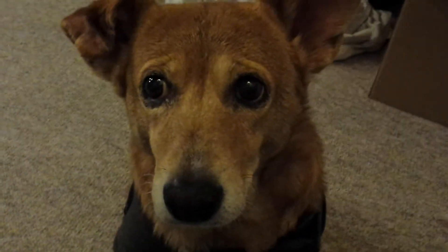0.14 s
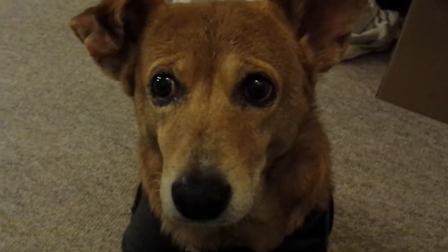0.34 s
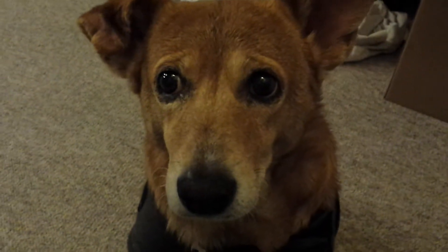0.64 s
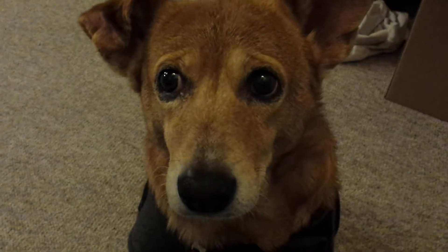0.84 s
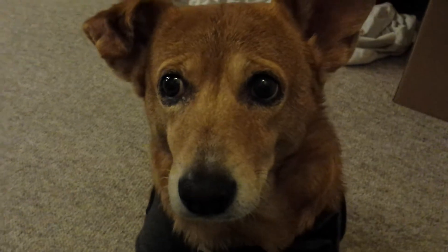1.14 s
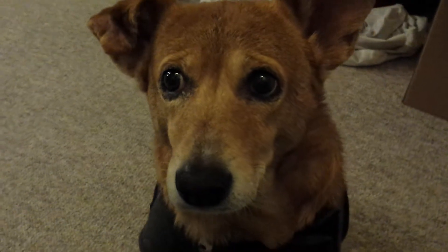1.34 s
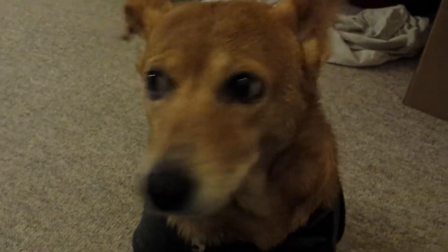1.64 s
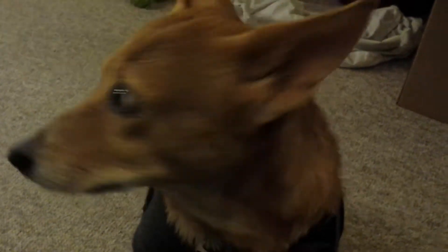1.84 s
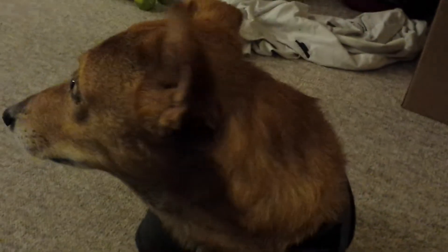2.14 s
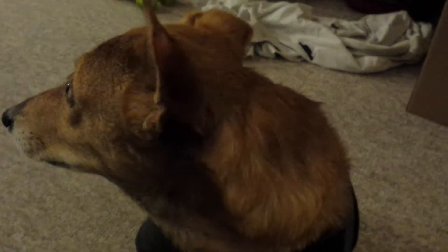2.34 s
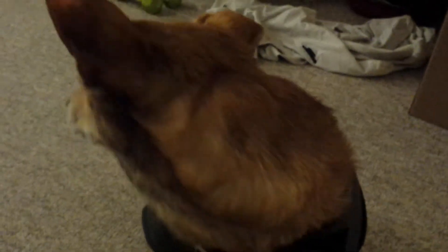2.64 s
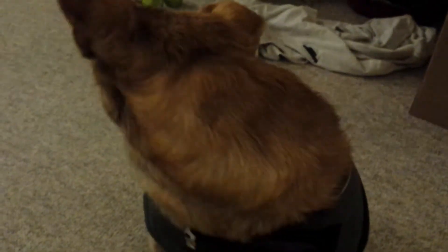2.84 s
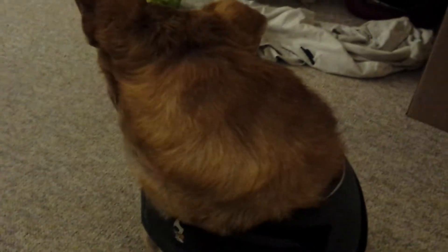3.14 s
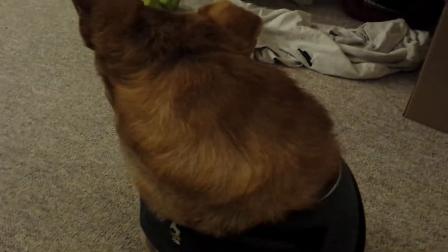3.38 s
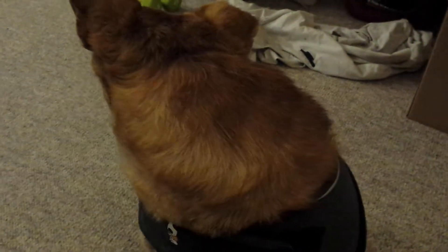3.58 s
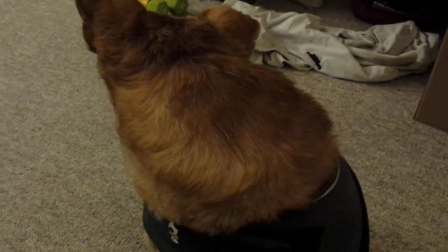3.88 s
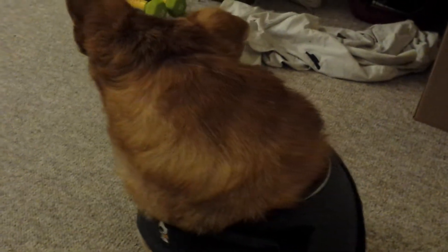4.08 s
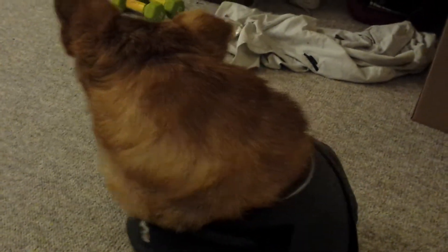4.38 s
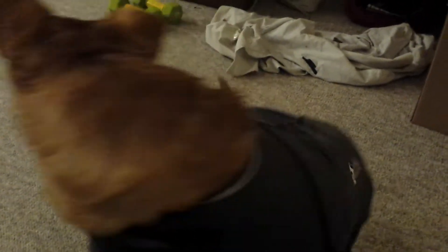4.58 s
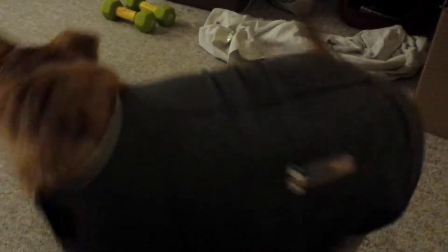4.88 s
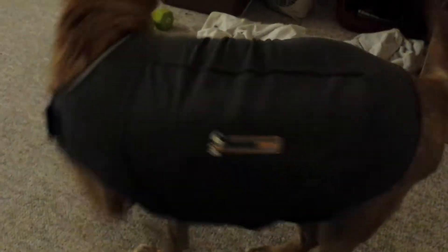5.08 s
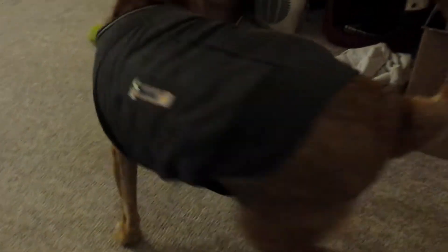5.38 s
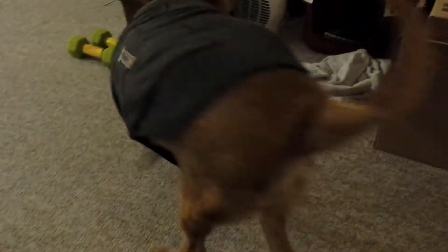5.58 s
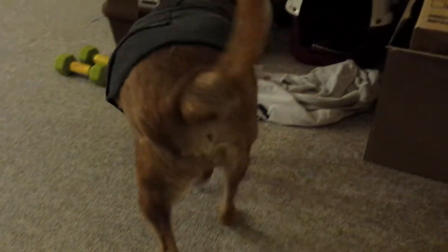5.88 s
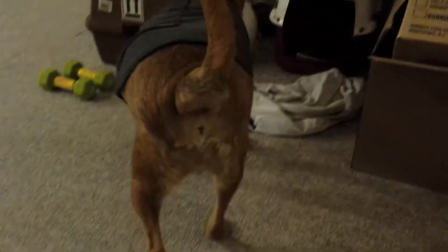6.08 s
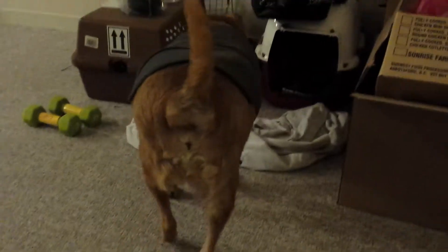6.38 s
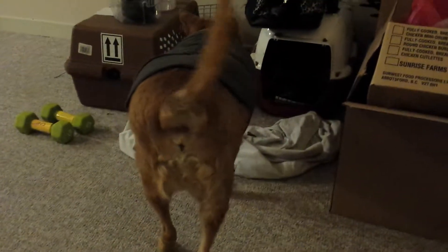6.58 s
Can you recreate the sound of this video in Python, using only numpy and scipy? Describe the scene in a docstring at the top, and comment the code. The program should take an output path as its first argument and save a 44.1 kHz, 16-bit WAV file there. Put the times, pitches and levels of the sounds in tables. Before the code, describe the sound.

Soft, close rustles and light clicks come from a small dog fidgeting in a cloth coat, slightly to the left. Two sharp static pops, far louder than anything else, strike the microphone three seconds apart, first left, then right. Afterwards the rustling grows busier as padded steps thump and scuff across the carpet, then die down. The room is hushed and dry, with a barely audible engine far outside.

```python
"""Small dog in a coat on carpet.

A dog shifts about close to a camera, gets up and walks off. Its fabric coat rustles over fur, its paws
scuff the pile and thud on the floor, and the coat's fastening ticks. Twice, static snaps into one
microphone channel. Far outside the quiet room an engine speeds up and settles."""
import sys
import numpy as np
from scipy import signal
from scipy.fft import rfft, irfft, next_fast_len
from scipy.io import wavfile
from scipy.ndimage import map_coordinates

SR = 44100
rng = np.random.default_rng(int(sys.argv[2]) if len(sys.argv) > 2 else 0)


def unload_wav(signal):
    """Save mono or channel-first audio to the path in sys.argv[1] as 16-bit WAV at rate SR, clipped to [-1, 1]."""
    wavfile.write(
        sys.argv[1],
        SR,
        np.round(np.clip(np.atleast_2d(signal).T, -1, 1) * 32767).astype(np.int16),
    )


N = 296352

# coat over fur, one swish per head turn or stride: peak_s, level_db, rise_s, fall_s
COAT_SWISHES = [(.028, -51, 0.039, 0.035), (.068, -56.5, .015, 0.049), (.15, -65, 0.065, 0.15),
                (.57, -56, 0.1, 0.18), (.725, -56.5, 0.078, 0.051), (0.873, -57, 0.013, 0.12),
                (1.03, -55.5, 0.093, 0.052), (1.21, -55, .06, 0.17), (1.379, -46.5, .06, 0.042),
                (1.431, -48.5, 0.035, 0.051), (1.51, -62, .04, 0.13), (1.775, -66, .03, 0.048),
                (2.06, -59, 0.18, .085), (2.58, -62.5, 0.2, 0.5), (2.936, -57, 0.11, 0.038),
                (2.999, -53.5, 0.022, 0.081), (3.179, -52.5, 0.016, 0.043), (3.228, -55.5, 0.051, 0.047),
                (3.5, -58.5, 0.092, 0.086), (3.979, -63, 0.13, .1), (4.21, -65.5, 0.12, 0.13),
                (4.49, -62, 0.18, .14), (4.65, -53.5, 0.046, 0.082), (4.8, -55, 0.094, .07),
                (4.876, -51.5, .045, 0.014), (4.99, -54.5, 0.08, 0.053), (5.16, -56.5, 0.12, 0.06),
                (5.283, -48.5, 0.034, 0.055), (5.41, -60, .09, .14), (5.638, -51, 0.029, 0.042),
                (5.768, -63, 0.029, .07), (5.858, -54.5, 0.01, 0.02), (5.98, -63.5, .1, 0.098),
                (6.097, -64.5, 0.014, 0.028), (6.52, -74.5, 0.2, 0.21)]
# paws and rump through the pile: peak_s, level_db, fall_s
PILE_DRAGS = [(1.425, -58, 0.026), (1.775, -71, .025), (2.078, -62, .02), (2.229, -69, 0.011),
              (3.0, -66, 0.023), (3.174, -57, 0.0087), (3.44, -65, .02), (4.43, -64.5, 0.041),
              (4.511, -54.5, 0.016), (4.65, -49, 0.046), (4.7, -50, 0.016), (4.8, -54.5, 0.04),
              (4.866, -50.5, 0.029), (4.98, -59, 0.049), (5.14, -54, 0.042), (5.285, -55.5, 0.025),
              (5.334, -53.5, .022), (5.467, -57, 0.012), (5.639, -52.5, 0.022), (5.768, -63, 0.04),
              (5.86, -65, 0.033), (6.102, -66.5, .03), (6.41, -72.5, .03), (6.468, -72, .016),
              (6.58, -74.5, 0.047)]
# spectra of coat hiss, coat folds, pile scuff and room noise: freq_hz, density_db
COAT_SPECTRUM = [(60, -23), (250, -4), (600, -15), (1500, -14), (2700, -8), (4800, -9), (6200, -4.5),
                 (7200, -2), (8500, -9.5), (10500, -18), (14500, -24.5)]
FOLD_SPECTRUM = [(300, -16), (1500, -2), (3000, -5), (5000, -8), (6800, 5), (9500, -6), (14500, -8.5)]
PILE_SPECTRUM = [(50, -10), (85, 1.5), (150, -0.5), (250, 3), (480, 2.5), (630, -1), (850, 1), (1250, -1),
                 (2200, -6), (3600, -12.5), (6000, -22), (14000, -36)]
QUIET_SPECTRUM = [(20, 3.5), (60, 2.5), (120, 5.5), (250, -3.5), (500, -8.5), (1200, -15), (3000, -15.5),
                  (5000, -15), (7200, -11.5), (10000, -15), (14500, -16)]
# paw landings: start_s, level_db, centre_hz
PAW_STEPS = [(0.206, -55.5, 200), (0.431, -52.5, 236), (0.951, -50.5, 255.4), (1.307, -54.5, 270),
             (1.429, -50, 279), (1.941, -54.5, 274), (2.405, -50, 253), (2.924, -47.5, 69.7),
             (3.427, -43, 218), (3.907, -54, 301), (4.408, -50.5, 200), (4.655, -46.5, 260),
             (4.695, -39.5, 335), (4.762, -46, 476), (4.801, -39.5, 323), (4.954, -29, 168),
             (4.989, -43, 190), (5.086, -39.5, 267), (5.146, -45, 440), (5.36, -39, 266), (5.476, -58, 393),
             (5.522, -48.5, 250), (5.64, -43, 288), (5.911, -56, 186), (6.004, -61, 305),
             (6.109, -59.5, 380), (6.366, -58.5, 221)]
# floor under the carpet: pitch_hz, level_db
FLOOR_MODES = [(68, -8), (115, -8), (165, -0.5), (222, -3.5), (265, -0.5), (335, -4.5), (420, -2),
               (485, -1), (660, -4)]
# flicks of coat and fastening: start_s, level_db, centre_hz
COAT_TICKS = [(0.625, -39, 6800), (0.7325, -41.5, 6100), (0.8669, -46, 6570), (1.954, -46, 6930),
              (2.0688, -43, 3300), (2.4434, -45, 7920), (2.9366, -44, 6520), (3.1668, -28, 6800),
              (4.2016, -52, 5000), (4.542, -50, 6970), (4.8722, -44, 6970), (4.885, -36.5, 3020),
              (5.114, -37, 6640), (5.1487, -39, 1800), (5.179, -35.5, 7800), (5.2666, -38, 7000),
              (5.279, -33.5, 6300), (6.5407, -53, 7070)]
# ring of the fastening: pitch_hz, level_db, t60_s
CLASP_MODES = [(3950, -14.5, 0.089), (6730, 4, 0.019), (7710, -10, 0.034)]
# static discharges: start_s, level_db, channel (0 left, 1 right), edge_hz
STATIC_SPARKS = [(.5819, -14, 0, 12000), (.5828, -5, 0, 10000), (3.5371, -4.3, 1, 5000)]
# far engine: time_s, firing_hz, level_db
ENGINE_RUN = [(.55, 76.4, -85.5), (.7, 77.3, -66), (.9, 80, -79), (1.15, 84, -68), (1.7, 97, -87.5),
              (2.3, 117.3, -82), (2.7, 123.4, -74.5), (3.2, 126.2, -82), (4, 110.5, -86), (5, 108, -69),
              (5.8, 107.6, -76), (6.72, 109.3, -87)]
# left-right likeness of noise: freq_hz, correlation
STEREO_LIKENESS = [(100, .7), (500, 0.34), (3000, 0.13), (7000, 0.066), (12000, .1)]
# the dog's stereo balance: freq_hz, left_minus_right_db
DOG_BALANCE = [(100, 4), (500, 1), (2000, 6), (4500, 7.5), (7500, -2), (12000, -4.5)]
# room decay: freq_hz, t60_s
ROOM_DECAY = [(100, 0.24), (500, 0.18), (4000, 0.05), (12000, 0.12)]

COAT_GAIN_DB, PILE_GAIN_DB, FOLD_GAIN_DB = 0.72, -0.53, -7
SEAT_GAIN_DB = -12  # each swish also works the dog's weight into the pile
FIDGET_DB, FIDGET_SWING_DB, FIDGET_FADE_DB_PER_S = -74, 1.5, 26  # faint rustle between swishes
STANDS_S, LEAVES_S = 4.6, 6
PAW_T60_S, HEAVY_T60_S, HEAVY_DB = 0.099, 0.054, -34  # floor ring at 250 Hz; a heavy paw damps it
VEER_DB = 1  # added left minus right once standing
TOP_HZ = 14800


def rubbing():
    """The coat hisses over fur, paws and rump scuff the pile; once the dog is up, folds crinkle."""
    gone_s = np.maximum(np.arange(N) / SR - LEAVES_S, 0)
    fidget = amp(FIDGET_DB + FIDGET_SWING_DB * wobble(5.7) - FIDGET_FADE_DB_PER_S * gone_s)
    swish_power = sum(stroke(*row) for row in COAT_SWISHES)
    drag_power = sum(stroke(peak_s, db, 0.91 * fall_s, fall_s) for peak_s, db, fall_s in PILE_DRAGS)
    sliding = np.sqrt(fidget ** 2 + swish_power)
    dragging = np.sqrt((amp(SEAT_GAIN_DB) * sliding) ** 2 + drag_power)
    coat = friction(COAT_SPECTRUM, slips_per_s=3000, size_db=1, hiss_db=3, flutter_db=1.77)
    scuff = friction(PILE_SPECTRUM, slips_per_s=1400, size_db=2.5, hiss_db=-5, flutter_db=2.7)
    folds = friction(FOLD_SPECTRUM, slips_per_s=450, size_db=2.5, hiss_db=-12, flutter_db=5)
    return (amp(COAT_GAIN_DB) * sliding * coat
            + amp(PILE_GAIN_DB) * dragging * scuff
            + amp(FOLD_GAIN_DB) * standing() * sliding * folds)


def friction(spectrum, slips_per_s, size_db, hiss_db, flutter_db):
    """Fibres catch and slip: tiny uneven snaps over a smooth hiss, bunched in flutters."""
    slips = rng.random(N) < slips_per_s / SR
    sizes = amp(size_db * np.minimum(rng.exponential(size=N), 3))
    tufts = amp(3 * np.clip(wobble(260), -2, 2))  # several fibres let go together
    snaps = unit(slips * sizes * tufts * rng.uniform(-0.92, 1, (2, N)))
    hiss = amp(hiss_db) * rng.standard_normal((2, N))
    return unit(spread(snaps + hiss, spectrum) * amp(flutter_db * wobble(90)))


def stroke(peak_s, level_db, rise_s, fall_s, drop_db=10, roundness=1.23):
    """Power of one rub: drop_db down at rise_s before the peak and at fall_s after it."""
    t = np.arange(N) / SR - peak_s
    away = np.maximum(-t / rise_s, t / fall_s)
    return amp(level_db - drop_db * np.clip(away, 0, 10) ** roundness) ** 2


def standing():
    """0 while the dog sits, rising to 1 on its feet."""
    return np.clip((np.arange(N) / SR - STANDS_S) * 10 + .5, 0, 1)


def paws():
    """A soft pad strikes, then settles roughly into the pile; slower steps favour low floor modes."""
    out, t = np.zeros((2, N)), np.arange(SR // 4) / SR
    mode_hz, mode_db = np.transpose(FLOOR_MODES)
    count = len(mode_hz)
    signs = (-1) ** np.arange(count)
    for start_s, level_db, centre_hz in PAW_STEPS:
        gains = amp(mode_db + rng.normal(0, 1.2, count)) * hump(mode_hz, centre_hz, octaves=0.65)
        pitch_hz = mode_hz * np.exp(rng.normal(0, 0.034, count))  # each spot rings its own way
        t60_s = HEAVY_T60_S if level_db > HEAVY_DB else PAW_T60_S
        mode_t60_s = t60_s * (250 / mode_hz[:, None]) ** 0.36
        modes = np.sin(2 * np.pi * pitch_hz[:, None] * t) * decay(t, mode_t60_s)
        ring = (signs * gains) @ modes
        settling = decay(t, t60_s=0.16) * rng.standard_normal((2, len(t)))
        force = (t == 0) + amp(-4) * settling / np.linalg.norm(settling[0])
        thud = signal.fftconvolve(force, ring[None], axes=1)[:, :len(t)]
        thud = highpass(thud, 0.26 * centre_hz, order=2)  # a small patch radiates little bass
        add(out, start_s, amp(level_db) * thud / np.abs(thud).max())
    return out


def ticks():
    """Each flick: a sharp crack, a dying rasp of cloth and a faint ring of the fastening."""
    out, t = np.zeros((2, N)), np.arange(SR // 6) / SR
    for start_s, level_db, centre_hz in COAT_TICKS:
        crack = amp(-6) * decay(t, t60_s=0.0044) * rng.standard_normal((2, len(t)))
        cloth = spread(rng.standard_normal((2, len(t))), COAT_SPECTRUM)
        rasp = unit(filtered(cloth, lambda hz: hump(hz, centre_hz, octaves=1.4)))
        rasp *= decay(t, t60_s=0.015) + amp(-7) * decay(t, t60_s=0.06)
        ring = 0
        for mode_hz, mode_db, t60_s in CLASP_MODES:
            gain = amp(mode_db) * hump(mode_hz, centre_hz, octaves=0.46)
            ring += gain * decay(t, t60_s) * np.sin(2 * np.pi * (mode_hz * t + rng.random((2, 1))))
        add(out, start_s, amp(level_db - 8) * (crack + rasp + ring))
    return out


def sparks(low_cut_hz, leak_hz):
    """A discharge jolts one input with a voltage step; the low-cut swings it back to zero."""
    steps = np.zeros((2, N))
    for start_s, level_db, channel, edge_hz in STATIC_SPARKS:
        step = amp(level_db - 0.67) * (np.arange(N) >= start_s * SR)
        steps[int(channel)] += signal.lfilter(*signal.butter(1, edge_hz, fs=SR), step)
    leaked = highpass(steps, leak_hz, order=1)
    return highpass(leaked, low_cut_hz, order=2)


def engine():
    """Only the far engine's two lowest orders pass the walls; a room mode swells the second."""
    firing_hz, level_db = curves(ENGINE_RUN)
    phase = 2 * np.pi * np.cumsum(firing_hz * (1 + .007 * wobble(14))) / SR
    second_gain = amp(-7) + amp(11) * hump(2 * firing_hz, centre_hz=200, octaves=0.043)
    hum = np.sqrt(2) * (np.sin(phase) + second_gain * np.sin(2 * phase))
    return amp(level_db + 1.1 * wobble(21)) * hum


def room(x):
    """Short reverberation of a carpeted room, one tail per microphone."""
    hz, t, noise = signal.stft(rng.standard_normal((2, SR // 3)), SR, nperseg=256)
    tail = signal.istft(noise * decay(t, along(ROOM_DECAY, hz)[:, None]), SR, nperseg=256)[1]
    tail = np.pad(tail / np.linalg.norm(tail[0]), ((0, 0), (SR // 200, 0)))  # 5 ms delay
    return signal.fftconvolve(x, tail, axes=1)[:, :N]


def spread(pair, spectrum):
    """Two unrelated signals to a coloured, partly alike stereo pair of rms 1."""
    def response(hz):
        angle = np.arccos(np.clip(along(STEREO_LIKENESS, hz), -1, 1)) / 2
        return amp(along(spectrum, hz)) * [np.cos(angle), np.sin(angle)]
    mid, side = filtered(pair, response)
    return unit(np.array([mid + side, mid - side]))


def amp(db):
    """Decibels to gain."""
    return 10 ** (np.asarray(db) / 20)


def decay(t, t60_s):
    """Gain falling 60 dB per t60_s."""
    return amp(-60 * t / t60_s)


def unit(x):
    """Scale to rms 1."""
    return x / np.sqrt(np.mean(x ** 2) + 1e-20)


def along(points, hz):
    """Interpolate (freq_hz, value) points on a log axis."""
    freq_hz, values = np.transpose(points)
    return np.interp(np.log(hz + 1), np.log(freq_hz + 1), values)


def curves(rows):
    """One value per sample for each column after the time."""
    time_s, *columns = np.transpose(rows)
    return [np.interp(np.arange(N) / SR, time_s, column) for column in columns]


def wobble(knots_per_s):
    """Smooth random curve."""
    knots = rng.standard_normal(int(N * knots_per_s / SR) + 4)
    return map_coordinates(knots, [np.arange(N) * knots_per_s / SR])


def hump(hz, centre_hz, octaves):
    """Bell of gain on a log-frequency axis."""
    return np.exp(-.5 * (np.log2((hz + 1) / centre_hz) / octaves) ** 2)


def filtered(x, response):
    """Apply the gain response(hz) at zero phase."""
    n = x.shape[-1]
    size = next_fast_len(2 * n)
    return irfft(rfft(x, size) * response(np.fft.rfftfreq(size, 1 / SR)), size)[..., :n]


def highpass(x, cutoff_hz, order):
    """Causal low-cut."""
    return signal.lfilter(*signal.butter(order, cutoff_hz, "high", fs=SR), x)


def add(track, start_s, sound):
    """Mix a sound in at start_s."""
    i = round(start_s * SR)
    track[..., i:i + sound.shape[-1]] += sound[..., :max(N - i, 0)]


def scene():
    """The dog, slightly left, in a quiet room, with sparks and a far engine."""
    dog = rubbing() + paws() + ticks()
    dog = filtered(dog, lambda hz: amp(np.outer([.5, -.5], along(DOG_BALANCE, hz))))
    dog *= amp(np.outer([.5, -.5], VEER_DB * standing()))
    quiet = amp(-70) * spread(rng.standard_normal((2, N)), QUIET_SPECTRUM)
    return dog + amp(-12) * room(dog) + engine() + quiet + sparks(low_cut_hz=89, leak_hz=11)


def record(dry):
    """The camera's band limit: a 400 Hz wide ramp centred on TOP_HZ."""
    return filtered(dry, lambda hz: np.clip((TOP_HZ - hz) / 400 + .5, 0, 1))


dry = scene()
out = record(dry)
unload_wav(out)
```